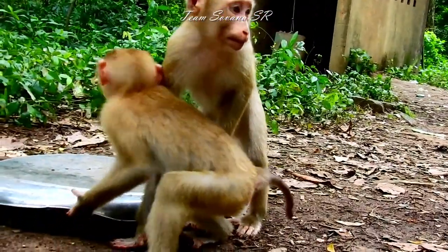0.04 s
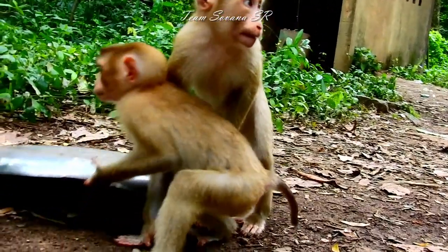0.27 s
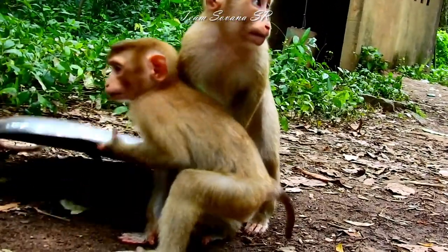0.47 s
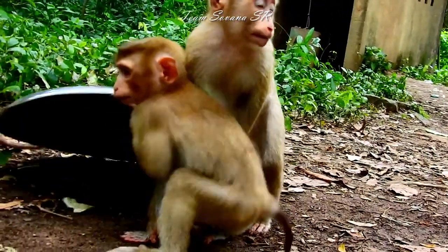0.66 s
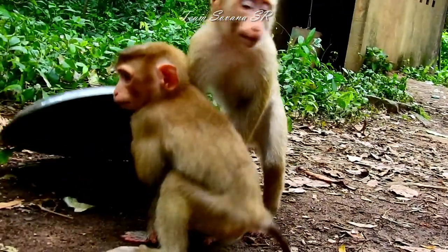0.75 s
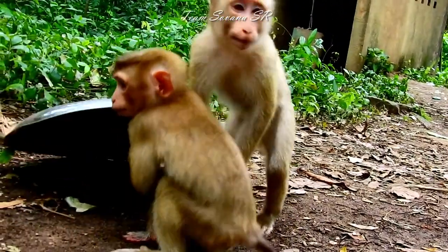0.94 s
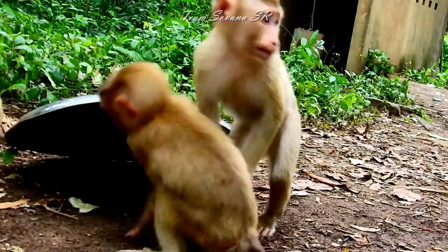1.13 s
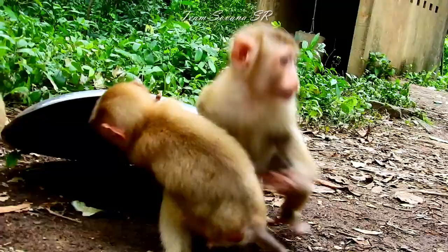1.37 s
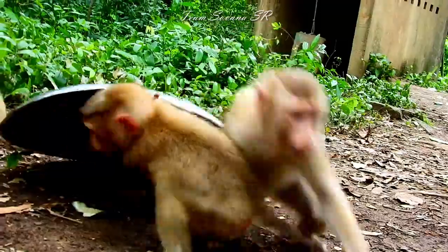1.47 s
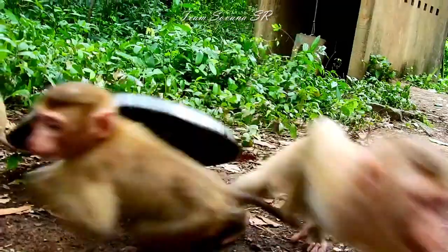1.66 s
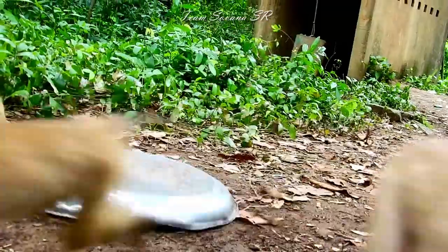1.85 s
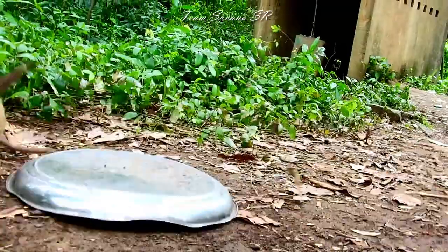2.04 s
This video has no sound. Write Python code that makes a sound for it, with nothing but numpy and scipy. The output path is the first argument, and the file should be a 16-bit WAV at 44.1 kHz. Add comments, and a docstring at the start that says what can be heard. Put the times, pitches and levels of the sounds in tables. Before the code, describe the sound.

Close by, a large metal tray rattles lightly and drags over dirt and crackling leaves. After a quieter moment it scrapes again and slams down in a loud, ringing clatter, with a soft outdoor rumble and hiss underneath.

```python
"""Tinny knocks and a dragging rim rustle through dry leaves: a young monkey tips up a big thin metal tray.
Each knock rattles and rings the sheet; the rim grinds over the ground and stirs its low bowing modes.
The tray falls with a low thump that spreads upward through its modes into a harsh, cymbal-like crash,
and grit chatters on the metal. A quiet outdoor rumble and a high hiss lie underneath."""
import sys
import numpy as np
from scipy import signal
from scipy.fft import rfft, irfft
from scipy.io import wavfile

SR = 44100
rng = np.random.default_rng(int(sys.argv[2]) if len(sys.argv) > 2 else 0)


def put_to_file(sound):
    """Save the sound as 16-bit audio at rate SR, in the file named by the first command-line argument."""
    columns = np.atleast_2d(sound).T  # one column per channel
    safe = np.clip(columns, -1, 1)
    whole_steps = np.round(safe * 32767)
    wavfile.write(sys.argv[1], SR, whole_steps.astype(np.int16))


N = 92962
T = np.arange(N) / SR
FREQS = np.fft.rfftfreq(N, 1 / SR)
TOP_HZ = 15800

# the tray's clearest modes: pitch_hz, held_db, free_db
TRAY_MODES = [(440, -19, -16), (497, -17, -5.5), (722, -19, -9), (880.4, -3.5, -3.5), (945, 0.5, -6),
              (1003, -5, -31), (1106, 3, -7), (1261, 1.5, 4.5), (1327, 2, 2.5), (1367, 2.5, 7),
              (1445, -3, 9), (1461, 5, -3), (1615, -10, 2.5), (1697, -2, -5), (1850, 1, -3.5),
              (2165, -1, 1.5), (2208, -7, -3), (2443, -8, -6), (2492, 0, 0.5), (3115, -3.5, -8.5)]
# the rim slams on the ground: start_s, bass_db, middle_db, treble_db
SLAMS = [(1.898, -20.5, -15.5, -23), (1.948, -55, -24, -18), (1.987, -26, -17.5, -24),
         (2.028, -21, -21.5, -37), (2.072, -21.5, -23, -11.5)]
# stereo width, opening toward the treble: freq_hz, side_db
WIDTH = [(100, -31.5), (700, -18.5), (5000, -6)]


def undb(db):
    return 10 ** (np.asarray(db) / 20)


def unit(x):
    return x / np.sqrt(np.mean(x ** 2))


def curve_gain(points, hz):
    """Gain at hz along a curve of freq_hz, level_db."""
    f, db = np.array(points, float).T
    return undb(np.interp(np.log(np.maximum(hz, 1)), np.log(f), db))


def noise(gain, side_db=0, source=None):
    """Stereo noise of rms 1, coloured by a gain at each of FREQS."""
    mid, side = rfft(rng.standard_normal((2, N)) if source is None else source) * gain
    side = side * curve_gain(WIDTH, FREQS) * undb(side_db)
    return unit(irfft(np.array([mid + side, mid - side]), N))


def grains(per_s, scatter_db):
    """Random small clicks of uneven size."""
    clicks = (rng.random((2, N)) < per_s / SR) * rng.choice([-1, 1], (2, N))
    return clicks * undb(scatter_db * np.minimum(rng.exponential(size=(2, N)), 5))


def walk(per_s):
    """Random drift with a spread near 1."""
    return np.interp(T * per_s, np.arange(400), rng.standard_normal(400))


def decay(start_s, decay_s, rise_s=0.00014):
    """Rounded attack, exponential release."""
    age = np.maximum(T - start_s, 0)
    return (1 - np.exp(-(age / rise_s) ** 2)) * np.exp(-age / decay_s)


def registers(hz):
    """Equal-power crossover gains for bass, middle and treble."""
    low, high = (1 / (1 + (hz / edge_hz) ** 8) for edge_hz in (695, 2730))
    return np.sqrt([low, np.maximum(high - low, 0), 1 - high])


def air():
    """A gently wavering bed of outdoor rumble and high hiss."""
    # colour of the open air: freq_hz, level_db
    colour = [(25, -24), (45, 5), (160, -1), (700, -17.5), (2800, -26), (4500, -20), (4870, -9.5),
              (5200, -33), (15000, -59.5)]
    return noise(curve_gain(colour, FREQS), side_db=7) * undb(-48 + 0.59 * walk(8.46))


def litter():
    """Dry leaves and grit crackle in countless small grains under feet and rim."""
    # colour of dry leaves: freq_hz, level_db
    colour = [(300, -34), (800, 2.5), (1500, -7.5), (4800, 7.5), (7000, -16), (15000, -57)]
    # rise and fall of the rustle: time_s, level_db
    rustle = [(0, -49), (.25, -47.5), (.45, -53), (.94, -53.5), (1.0, -50), (1.05, -56), (1.27, -56),
              (1.32, -46), (1.42, -51), (1.49, -46.5), (1.85, -46.5), (2.1, -38)]
    crackle = noise(curve_gain(colour, FREQS), source=grains(per_s=3000, scatter_db=-1.5))
    return crackle * undb(np.interp(T, *np.array(rustle).T) + walk(44.7))


def drag():
    """The rim judders over the ground and stirs the bowing modes."""
    # bowing modes of the whole sheet: pitch_hz, width_hz, level_db
    bowing = [(177.7, 27, 3), (372, 13.2, -6), (451, 82, -8.5)]
    # strength of the drag: time_s, level_db
    strength = [(0, -55), (.57, -51), (.7, -43.5), (.92, -55.5), (1.5, -56.5), (1.65, -68.5)]
    colour = sum(undb(db) / (1 + 2 * ((FREQS - hz) / width) ** 2) for hz, width, db in bowing)
    return noise(colour) * undb(np.interp(T, *np.array(strength).T))


def wash_spectrum():
    """The sheet's dense, weaker modes form many narrow, uneven peaks."""
    # outline of the metallic wash: freq_hz, level_db
    outline = [(100, -28), (200, -15), (450, -5.5), (580, -13.5), (680, -5), (880, -1.5), (1400, 7),
               (2050, -5), (2500, -1.5), (2780, -10.5), (3050, -6.5), (4700, -15.5), (5300, -21),
               (6200, -47.5), (15000, -63.5)]
    ripple_db, spacing_hz = 4.5, 22.15
    peaks = np.clip(rng.standard_normal(4000), -1.5, 1.5)
    ripple = np.interp(FREQS / spacing_hz, np.arange(len(peaks)), peaks)
    return curve_gain(outline, FREQS) * undb(ripple_db * ripple)


def mode_tones(held):
    """Each clear mode wanders in pitch and flutters, as when modes trade energy."""
    wander_hz, flutter_db = 2.72, 2.5
    gains = undb([held_db if held else free_db for _, held_db, free_db in TRAY_MODES])
    gains /= np.sqrt(np.sum(gains ** 2) / 2)
    for (hz, *_), gain in zip(TRAY_MODES, gains):
        phase = 2 * np.pi * (np.cumsum(hz + wander_hz * walk(39.42)) / SR + rng.random())
        stereo_lag = curve_gain(WIDTH, hz) * rng.choice([-1, 1]) * np.array([[1], [-1]])
        yield hz, gain * undb(flutter_db * walk(28)) * np.sin(phase + stereo_lag)


def pressed_colour():
    """Contact broadens the held tray's modes into peaks and valleys that colour a rattle."""
    def power(width_hz):
        return sum(undb(db) ** 2 / width_hz / (1 + ((FREQS - hz) / width_hz) ** 2)
                   for hz, db, _ in TRAY_MODES)
    depth = 0.91
    return (power(width_hz=16) / power(width_hz=160)) ** (depth / 2)


def knocks(wash):
    """Each knock is a bright snap and a brief, crunchy rattle, after which the sheet rings on."""
    # handling knocks: start_s, bass_db, middle_db, treble_db, rattle_s, ring_offset_db, snap_offset_db
    hits = [(0.0075, -51.5, -32, -33, 0.0053, -15.5, -17), (0.139, -39.5, -42, -69, 0.013, -12.5, -14),
            (0.17, -39, -38, -42, 0.039, -14, -25), (0.1972, -53, -30.5, -30.5, 0.017, -13, -10),
            (0.370, -38, -32.5, -34, 0.014, -15.5, -8), (1.7022, -56, -40, -34, 0.022, -14.5, -8),
            (1.801, -69.5, -57, -35.5, 0.028, -8.5, -2), (1.82, -43, -39.5, -54, 0.0052, -6, -18),
            (1.845, -53, -53, -36, 0.014, -25, -14)]
    # colour of a contact: freq_hz, level_db
    contact = [(100, -1), (400, 9.5), (600, -12), (1000, 3.5), (2600, 5), (5200, 6), (7000, -16.5),
               (15000, -57)]
    ring_s, snap_s = 0.87 / np.log(1000), 0.0008  # the ring falls 60 dB in 0.87 s
    out, rings = 0, []
    for band, wash_db in enumerate((-1.5, -1.5, 0)):
        rattle_power = ring_power = 0
        for start, *band_db, rattle_s, ring_db, snap_db in hits:
            gain = undb(band_db[band])
            snap = undb(snap_db) * decay(start, snap_s) if band == 2 else 0
            rattle_power += (gain * (decay(start, rattle_s) + snap)) ** 2
            ring_power += (gain * undb(ring_db) * decay(start, ring_s, rise_s=0.0014)) ** 2
        rings.append(np.sqrt(ring_power))
        passband = registers(FREQS)[band]
        colour = curve_gain(contact, FREQS) * passband * (pressed_colour() if band == 1 else 1)
        out += np.sqrt(rattle_power) * noise(colour, source=grains(per_s=5000, scatter_db=2))
        out += rings[band] * undb(wash_db) * noise(wash * passband)
    tones = sum(tone * (registers(hz) ** 2 @ np.array(rings)) for hz, tone in mode_tones(held=True))
    return out + undb(0.5) * tones


def scrapes():
    """The rim grinds over the ground: a gritty resonance that glides as the contact moves."""
    # slides of the rim: start_s, length_s, first_hz, last_hz, half_width_hz, level_db
    slides = [(0.138, 0.033, 883, 950, 150, -42), (0.2, 0.13, 1056, 942, 100, -46),
              (1.352, 0.22, 1426, 2660, 230, -55), (1.636, 0.39, 1244, 1217, 260, -48.5),
              (1.791, 0.14, 1200, 1124, 130, -44.5)]
    out = 0
    for start, length, first_hz, last_hz, width_hz, db in slides:
        progress = np.clip((T - start) / length, 0, 1)
        phase = 2 * np.pi * np.cumsum(first_hz + (last_hz - first_hz) * progress) / SR
        roughness = 1 / (1 + (FREQS / width_hz) ** 2)
        grind = unit(sum(wave(phase) * noise(roughness, side_db=10) for wave in (np.sin, np.cos)))
        out += undb(db) * grind * np.sin(np.pi * progress ** 0.54)  # bites early, then eases off
    return out


def thumps():
    """The sheet bumps the earth and swings for a few cycles."""
    # dull bumps: start_s, pitch_hz, level_db, decay_s
    bumps = [(0.370, 203, -22, 0.0056), (0.407, 178, -35.5, 0.019), (0.872, 835, -45, 0.02),
             (0.965, 465, -35, 0.0077), (1.247, 505, -41, 0.014), (1.8958, 227, -11.5, 0.011)]
    return sum(-undb(db) * decay(start, decay_s, rise_s=0.001) * np.sin(2 * np.pi * hz * (T - start))
               for start, hz, db, decay_s in bumps)


def grit():
    """Loose grains chatter on the landed sheet, and short, bright clicks sound at the crash's loudest peaks."""
    # short, bright clicks at the crash's loudest peaks: start_s, level_db
    ticks = [(1.896, -34), (1.9163, -36), (1.926, -44), (1.9603, -27.5)]
    colour = 1 / (1 + (FREQS / 4500) ** 2)
    chatter = noise(colour, side_db=-2, source=grains(per_s=730, scatter_db=2))
    cracks = noise(colour, side_db=-4) * sum(undb(db) * decay(start, 0.0008) for start, db in ticks)
    return cracks + undb(-48) * chatter * decay(SLAMS[0][0], decay_s=0.083)


def crash(wash):
    """Each slam feeds the low modes first; the higher ones swell later."""
    t60_s, wash_db = (0.29, 1, 0.97), (-2, -1, -1.5)  # bass, middle, treble
    spread_s_per_khz = 0.0084

    def swell(hz):
        share = registers(hz) ** 2
        decay_s = share @ t60_s / np.log(1000)
        delay_s = spread_s_per_khz * min(hz, 4000) / 1000
        return np.sqrt(sum((share @ undb(band_db) * decay(start + delay_s, decay_s, rise_s=0.0042)) ** 2
                           for start, *band_db in SLAMS))

    spectrum = rfft(noise(wash, side_db=-2.5))
    power = registers(FREQS) ** 2 @ wash ** 2
    makeup = np.sqrt(power.sum() / power)  # evens out the three registers
    edges = np.geomspace(100, TOP_HZ, 16)
    out = 0
    for low, high in zip(edges, edges[1:]):
        hz = np.sqrt(low * high)
        band = irfft(spectrum * ((FREQS >= low) & (FREQS < high)), N)
        out += band * swell(hz) * (registers(hz) ** 2 @ (makeup * undb(wash_db)))
    tones = sum(tone * swell(hz) * (registers(hz) ** 2 @ makeup) for hz, tone in mode_tones(held=False))
    return out + undb(-4) * tones


def limiter(x, threshold_db=-11, attack_s=0.00034, release_s=0.3):
    """Loud peaks pull the gain down at once; it recovers slowly."""
    over = np.log(np.maximum(np.abs(x).max(axis=0) / undb(threshold_db), 1))
    reduction = np.maximum.accumulate(over + T / release_s) - T / release_s
    pole = np.exp(-1 / (attack_s * SR))
    return x * np.exp(-signal.lfilter([1 - pole], [1, -pole], reduction))


def scene():
    """The ringing tray sits a little to the right, amid the sounds of ground and air."""
    # the tray's stereo balance: freq_hz, left_minus_right_db
    balance = [(750, 0.55), (1300, -3.5), (2200, -0.7), (4000, -0.5)]
    wash = wash_spectrum()
    metal = knocks(wash) + crash(wash) + scrapes()
    pan = curve_gain(balance, np.fft.rfftfreq(2 * N, 1 / SR)) ** np.array([[0.5], [-0.5]])
    tray = irfft(rfft(metal, 2 * N) * pan)[:, :N]
    return tray + air() + thumps() + grit() + drag() + litter()


def record(dry):
    """A limiter holds down the crash, a low-pass trims the top, and a 3 ms fade closes the sound."""
    lowpass = signal.ellip(8, 0.2, 70, TOP_HZ, fs=SR, output="sos")
    fade = np.sin(np.pi / 2 * np.minimum((T[-1] - T) / 0.003, 1)) ** 2
    return signal.sosfilt(lowpass, limiter(dry)) * fade


dry = scene()
out = record(dry)
put_to_file(out)
```